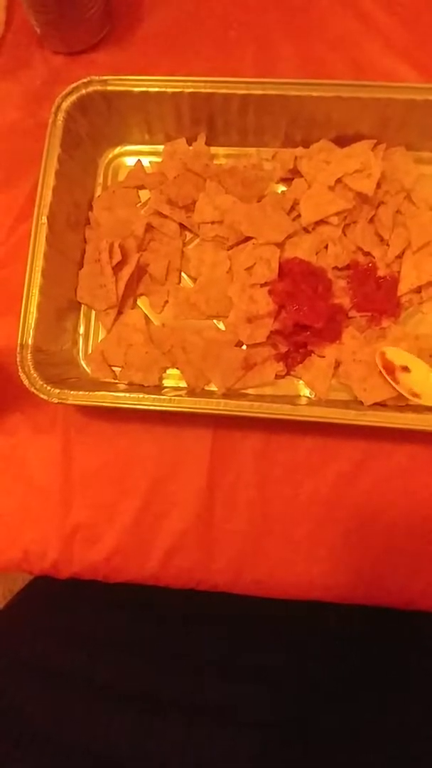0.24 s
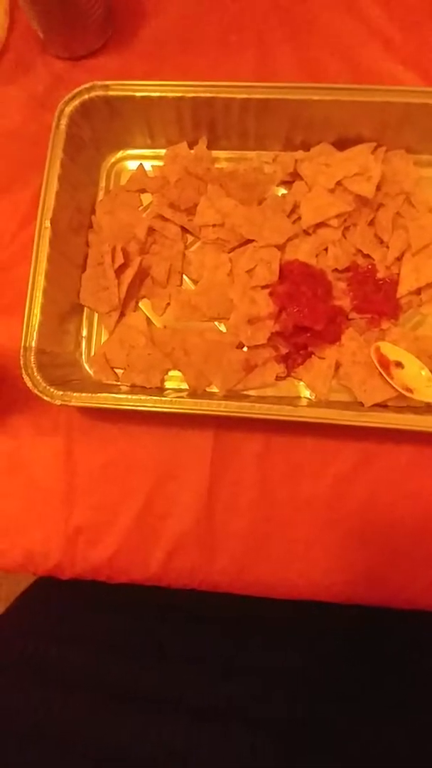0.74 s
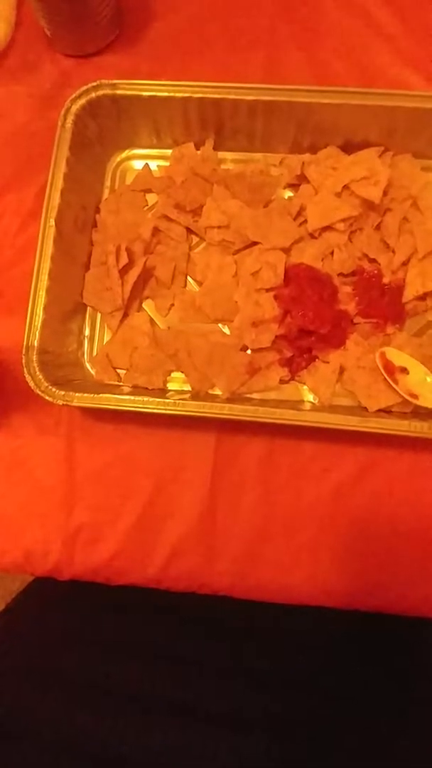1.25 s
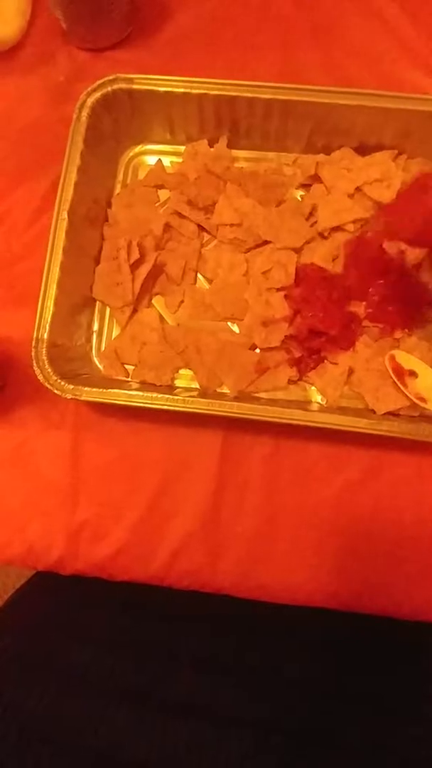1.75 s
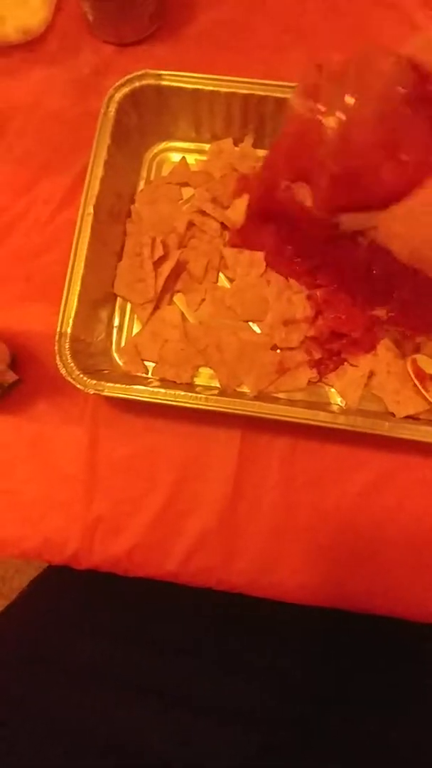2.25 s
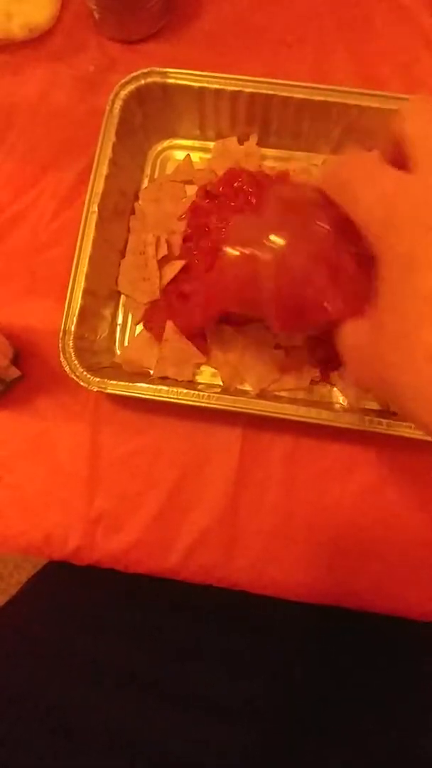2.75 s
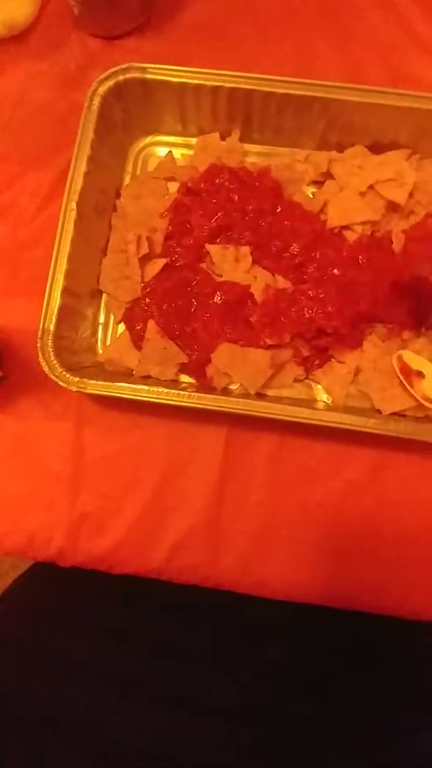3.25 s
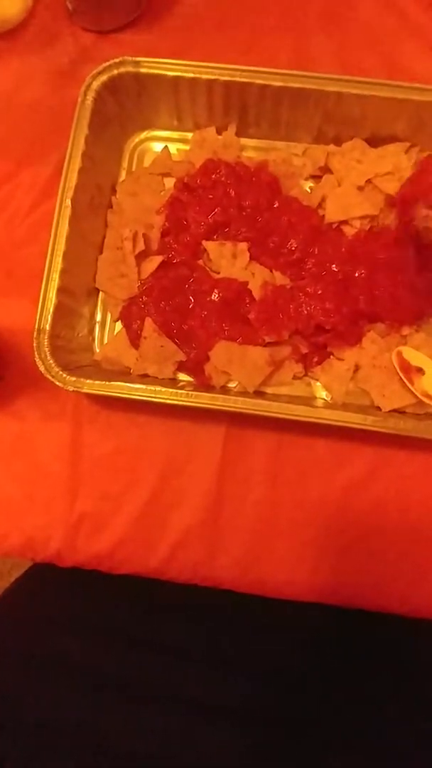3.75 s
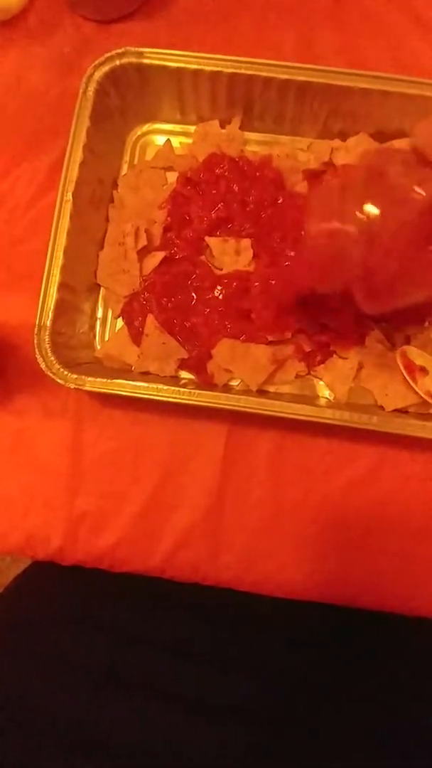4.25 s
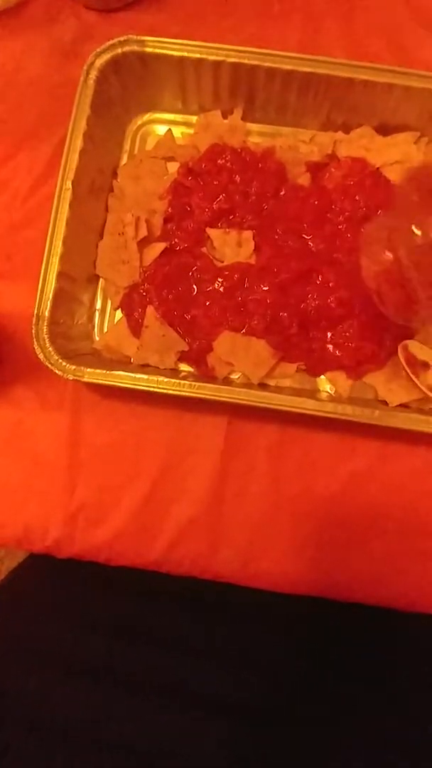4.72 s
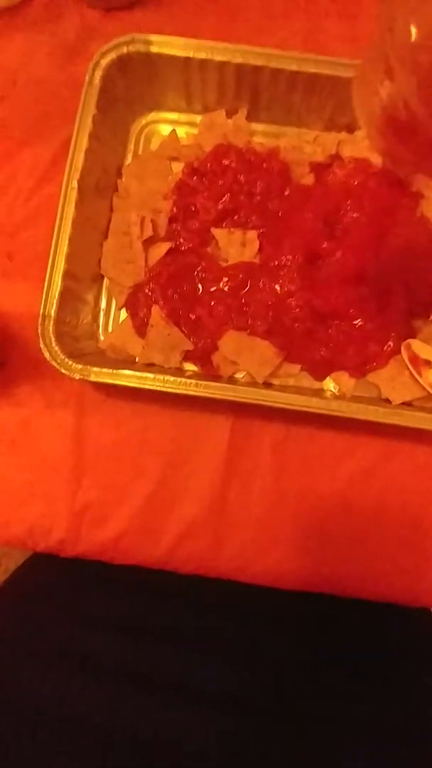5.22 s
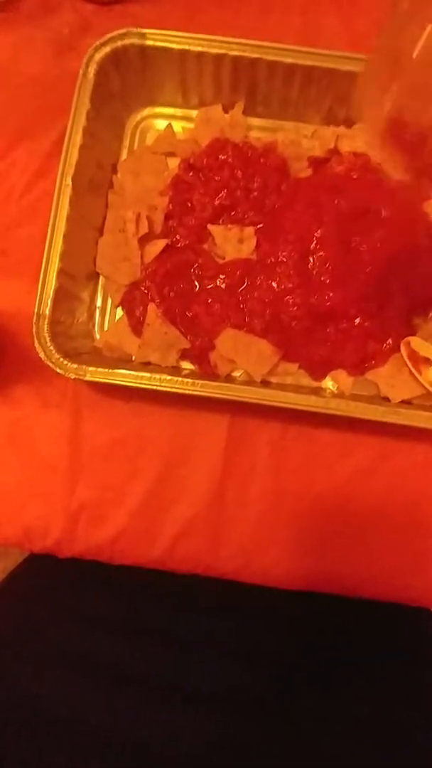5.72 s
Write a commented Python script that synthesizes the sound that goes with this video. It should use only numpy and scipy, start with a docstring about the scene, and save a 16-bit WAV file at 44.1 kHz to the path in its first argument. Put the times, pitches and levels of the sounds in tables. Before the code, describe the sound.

A close stereo pickup in a small home kitchen, with faint low appliance rumble and wavering hum throughout. After barely audible rustles, something hard knocks the covered table at about 0.2 s and bounces twice within a tenth of a second, sharp and short-ringing, with a dull scrape trailing to 0.4 s. It is nearly quiet until 1.4 s, when bright little ticks and light scrapes begin as a spoon pushes sauce over crisp chips in a thin foil pan. Crackling thickens from 2.0 s, with two soft, low wet plops near 2.2 and 2.3 s. The loudest passage runs 2.7 to 3.0 s: a crunchy, crackly scrape with stiff clacks and bright snaps. It falls away abruptly. Sparse faint scratches follow, with small clusters around 3.9 to 4.25 s and 4.5 to 4.75 s, then thin bright ticks near 5.1 and 5.4 s, and almost nothing to the end at 6 s.

```python
"""Chunky sauce over crisp chips

Chips slide, scrape and snap in a thin foil pan: friction noise and brief slips pass through the foil's colour.
Early on something hard knocks and bounces on the covered table as a set of damped modes over a noise crack.
Two lumps of sauce thud into the pan, each a short slap over three low modes of the pan floor.
Sparse kitchen reflections, low appliance rumble and wavering hum lie behind. Two close microphone ports listen.
"""
import sys
import numpy as np
from scipy import signal
from scipy.io import wavfile
from scipy.ndimage import uniform_filter1d

SR = 44100
rng = np.random.default_rng(int(sys.argv[2]) if len(sys.argv) > 2 else 0)


def store_pcm(level_fs):
    """Save levels as 16-bit WAV."""
    pcm = np.round(np.clip(level_fs, -1, 1) * 32767).astype(np.int16)
    wavfile.write(sys.argv[1], SR, np.atleast_2d(pcm).T)


def linear_from_db(decibels):
    """Turn decibels (scalar or array-like) into linear amplitude factors; 0 gives 1."""
    return 10 ** (np.asarray(decibels, float) / 20)


N = 263718  # length in samples

# Chips sliding on foil. Each row: start in seconds, stroke length in seconds, level in dB before the
# stroke's envelope, spectral tilt in dB per octave.
CHIP_SLIDES = [(0.023, 0.078, -57.5, -4.5), (0.108, 0.038, -52, -4), (0.3, 0.03, -30, -7.5),
               (0.333, 0.05, -40, -8.5), (0.385, 0.04, -43.5, -8), (0.499, 0.09, -73.5, 5),
               (0.686, 0.09, -69.5, 4.5), (0.834, 0.09, -73, 3), (0.991, 0.12, -74, 5),
               (1.396, 0.04, -63.5, 0), (1.451, 0.032, -61, 7), (1.483, 0.05, -43, 0),
               (1.536, 0.041, -58, 0), (1.57, 0.045, -42.5, -1), (1.641, 0.045, -32.5, 1.5),
               (1.784, 0.045, -39.5, 2.5), (1.89, 0.078, -58.5, 3.5), (1.967, 0.03, -44.5, 5.5),
               (1.996, 0.041, -33.5, 3), (2.052, 0.068, -36, 3.5), (2.115, 0.09, -43, 1.5),
               (2.241, 0.025, -51, 0.5), (2.263, 0.04, -44.5, -2), (2.331, 0.03, -45, 0.5),
               (2.39, 0.03, -44, -1), (2.505, 0.045, -53.5, 0.5), (2.566, 0.062, -40, 1.5),
               (2.623, 0.035, -40, -1), (2.659, 0.027, -35, -0.5), (2.713, 0.043, -24, 0.3),
               (2.745, 0.045, -20.5, -2), (2.798, 0.085, -28, -1.8), (2.891, 0.05, -25, -0.5),
               (2.958, 0.06, -32, -3), (3.023, 0.064, -57, 0.5), (3.139, 0.048, -60.5, -4),
               (3.215, 0.034, -58.5, -5.5), (3.318, 0.03, -67, 0.2), (3.651, 0.05, -65.5, -3),
               (3.689, 0.04, -54.5, -5), (3.86, 0.07, -41.5, 0.2), (4.003, 0.065, -53, 6.5),
               (4.081, 0.045, -61.5, -4), (4.201, 0.03, -46.5, 2.5), (4.355, 0.027, -56, -3),
               (4.423, 0.04, -64, 3), (4.522, 0.05, -41, -6), (4.577, 0.05, -50, -6.5),
               (4.678, 0.016, -47, -7.5), (4.708, 0.038, -51.5, -5), (4.939, 0.054, -59, -1),
               (5.085, 0.076, -70, 11.5), (5.208, 0.031, -67, 11), (5.399, 0.03, -44.5, 4.5),
               (5.431, 0.045, -55.5, 4), (5.773, 0.044, -60.5, 5), (5.931, 0.054, -71.5, -1.5)]
# Clear single snaps. Each row: start in seconds, level in dB, spectral tilt in dB per octave.
CHIP_SNAPS = [(0.12, -51.5, -2), (0.3856, -35.5, -6), (1.4435, -33.5, 23.5), (1.462, -39.5, 19),
              (1.4852, -43, 22), (2.004, -38.5, 4.5), (2.0585, -33.5, 4), (2.0648, -25, 7.5),
              (2.092, -36, 13), (2.132, -33, 3), (2.159, -35, 9), (2.2674, -38, 1.5), (2.2893, -40, 7),
              (2.3279, -41, 3), (2.412, -28, 3.5), (2.587, -44.5, 14.5), (2.5962, -42, 2),
              (2.7511, -23, -1.5), (2.803, -28.5, -3), (2.818, -33.5, 0), (2.85, -35, -8),
              (2.863, -31.5, -7), (2.883, -22.5, -1.5), (2.91, -20, 14), (2.9378, -32, -5),
              (3.003, -35, 1.5), (3.101, -54, -5), (3.158, -47.5, 3), (4.2115, -37.5, 6), (4.251, -41, 11),
              (4.344, -54, 9.5), (4.4351, -58, 10.5), (4.5297, -39.5, -4.5), (4.5488, -49, -4),
              (4.5879, -46, -5.5), (4.6837, -46, -9.5), (4.7179, -51, -3.5), (4.9324, -51, 7.5),
              (5.0359, -54.5, 16), (5.0755, -41.5, 24), (5.2094, -60, 10.5), (5.3943, -35.5, 9),
              (5.4349, -35, 12), (5.934, -60.5, -1)]
# Short pitched clacks of stiff chip pieces. Each row: start in seconds, level in dB, centre pitch in Hz.
CHIP_CLACKS = [(0.118, -32.5, 3220), (.12, -37, 1860), (0.23, -15, 9230), (1.794, -31, 3080),
               (2.279, -26, 3270), (2.64, -21, 9600), (2.72, -14, 2100), (2.746, -17, 3970),
               (2.748, -11, 8200), (2.75, -17, 5860), (2.76, -26, 1180), (2.779, -23, 3660),
               (4.032, -45, 3900), (4.051, -41.5, 3570), (4.547, -37, 1750), (4.587, -34, 3360),
               (4.592, -42, 2000), (4.609, -38.5, 3290), (4.681, -43, 1250), (4.715, -41.5, 3230),
               (4.744, -49, 3300), (4.932, -36, 5050), (4.965, -47.5, 2640), (5.206, -38, 8460)]
# Left-right balance of clacks by pitch. Each row: frequency in Hz, left over right in dB.
CLACK_BALANCE = [(1200, 4), (1900, 8), (3250, -9.5), (4500, -2.5), (9000, 6.5)]
# Colour of foil crackle at the microphone. Each row: frequency in Hz, relative density in dB per Hz.
FOIL_SPECTRUM = [(150, -26.5), (330, -11), (530, -18.5), (780, -7), (1500, -4.5), (2000, -3.5), (3300, -1),
                 (5600, -5.5), (7050, -12.5), (8000, -6.5), (9500, -1.5), (10700, -22), (12000, -13),
                 (15300, -23), (16300, -40)]
# A knock and its bounces. Each row: start in seconds, ring level in dB, crack level in dB,
# tilt of the ring in dB per octave, left over right in dB.
TABLE_KNOCKS = [(0.21, -21.5, -24, 4.5, -0.5), (0.243, -19, -13, 4, -1), (0.2874, -21.5, -21, 3, -2.5)]
# Modes of the knocked object. Each row: nominal frequency in Hz, level in dB before tilt, t60 in seconds.
KNOCK_MODES = [(807, -8, 0.16), (1022, -8, 0.14), (1295, -10, 0.24), (1462, -7.5, 0.12), (1870, 2, 0.035),
               (2092, -10, 0.16), (2316, -9, 0.072), (2700, -13.5, 0.24), (3080, -7.5, 0.12),
               (3570, -4.5, 0.02), (3570, -7.5, 0.065), (4970, -13.5, 0.035), (5530, -8, 0.038),
               (5800, -20, 0.046), (7820, -19, 0.028), (8330, -12, 0.017)]
# Lumps of sauce landing. Each row: start in seconds, slap level in dB, slap pitch in Hz,
# boom level in dB before its division among modes, middle boom pitch in Hz.
SAUCE_THUDS = [(2.195, -27.5, 663, -39.5, 232.4), (2.272, -28.5, 680, -38, 243.5)]
# Decay of the kitchen's reflections. Each row: frequency in Hz, t60 in seconds.
KITCHEN_DECAY = [(300, 0.38), (1000, 0.33), (3000, 0.17), (8000, 0.15), (15000, 0.059)]
# Spectrum of the room tone. Each row: frequency in Hz, relative density in dB per Hz.
ROOM_SPECTRUM = [(15, -2), (46, -4), (68, -9.5), (90, -21.5), (135, -11.5), (165, -15.5), (220, -14),
                 (350, -16), (500, -24.5), (855, -26), (1050, -35), (2600, -44.5), (9000, -48.5),
                 (15100, -54), (16300, -62)]
# Likeness of the room tone at the two ports. Each row: frequency in Hz, left-right correlation.
PORT_LIKENESS = [(60, 0.82), (180, 0.97), (550, 0.53), (1650, -0.35), (4970, -0.58), (15000, -0.35)]
# Wavering appliance tones. Each row: frequency in Hz, rms level in dB, bandwidth of the wander in Hz.
HUM_TONES = [(33.7, -60.5, 6.1), (59.2, -61, 4.4), (119.9, -57.5, 0.77), (259, -71.5, 9.4),
             (412.2, -68.5, 3.4)]

ROOM_RMS_DB, KITCHEN_DB = -47.5, -9.5  # kitchen level is against the direct sound
BEND_PER_TILT = -0.15  # bright sounds are also narrower
SLIDE_BEND_DB, SNAP_BEND_DB = -0.88, -0.5  # dB per octave squared: negative bows both ends down
SLIDE_SPREAD_DB, SNAP_SPREAD_DB = 1, 6.5  # scatter of left-right balance
SNAP_T60, TILT_PER_HALVING = 0.027, 29.5  # s at no tilt; dB per octave of tilt that halves it
CLACK_T60, CLACK_DAMPING = 0.03, 0.45  # s at 2 kHz; exponent by which higher pieces die sooner
CRACKLE_PER_S, CRACKLE_DB, CRACKLE_TILT_DB = 24, -3, 5  # chance snaps under a slide
GRIT_DB, GRIT_LOW_HZ, GRIT_OCTAVES = 3.0, 1101.6, 3.0  # chance clacks under a slide: level, pitch range


def slide(length, db, tilt_db, bend_db):
    """Stick-slip friction: hiss plus ringing slips under an arched stroke that judders at random."""
    length = max(length, .005)
    progress = np.arange(round(1.5 * length * SR)) / (length * SR)
    size = len(progress)
    stroke = np.minimum(progress / 0.27, 1) * linear_from_db(-35 * np.maximum(progress - .7, 0))
    # noise smoothed over 4 ms; the first 800 samples let the filter settle
    smoothed = signal.lfilter([1], [1, -np.exp(-1 / (.004 * SR))], rng.standard_normal(size + 800))
    judder_db = 3 * evened(smoothed[800:])
    hiss = 0.92 * both_ports(rng.standard_normal((3, size)), 0.84)
    rub = hiss + slips(size, 3200, 1.2, 0.0012)
    return linear_from_db(db) * foil_colour(evened(rub * linear_from_db(judder_db)) * stroke, tilt_db, bend_db)


def slips(size, per_s, spread_db, ring_s):
    """Impulsive excitation: each slip briefly rings a small patch of foil or chip at its own pitch."""
    draws = rng.random((int(size * per_s / SR) + 1, 6))
    when, pitch, weight, phase, lag, life = draws.T[:, :, None]
    hz = 300 + 15700 * pitch ** 1.5
    t = np.arange(300) / SR
    age = t / (ring_s * 8 ** (life - 1))  # from dry ticks to short rings
    strength = linear_from_db(-spread_db * np.log(weight + .03)) * np.sqrt(hz / 4000)
    envelope = strength * age * np.exp(-age)
    out = np.zeros((2, size + 300))
    places = (when * size).astype(int) + np.arange(300)
    for port in range(2):
        grains = envelope * np.sin(2 * np.pi * (hz * t + phase + port * lag))
        np.add.at(out[port], places, grains)
    return evened(out[:, :size])


def foil_colour(x, tilt_db, bend_db):
    """Radiation as a causal minimum-phase filter: the foil spectrum, tilted and bent about 4 kHz."""
    hz = np.abs(np.fft.fftfreq(1024, 1 / SR))
    octave = np.clip(np.log2(hz / 4000 + 1e-9), -2.3, 1.9)
    gain_db = read(FOIL_SPECTRUM, hz) + tilt_db * octave + bend_db * np.minimum(octave ** 2, 3.2)
    log_gain = np.log(linear_from_db(np.maximum(gain_db, -100)))
    # the Hilbert transform of log gain gives the minimum phase
    taps = np.fft.ifft(np.exp(np.conj(signal.hilbert(log_gain)))).real[:512]
    return signal.fftconvolve(x, taps[None] / np.linalg.norm(taps), axes=1)


def both_ports(x, unlike):
    """Extended radiator: the left port hears the shared part first; the whole sheet adds unlike parts."""
    shared, left, right = x
    unlike = np.clip(unlike, 0, 1)
    common = np.array([shared, np.roll(shared, 7)])  # delay in samples
    return np.sqrt(1 - unlike ** 2) * common + unlike * np.array([left, right])


def crackle(length, db, tilt_db):
    """Random point process: chance snaps and clacks of mixed size and colour while a chip slides."""
    out = np.zeros((2, round((length + .3) * SR)))
    chances = rng.random((8, 7))
    for use, when, size, colour, side, later, pitch in chances:
        happens = use < CRACKLE_PER_S * length / len(chances)
        size_db = db + 4.0 * np.log(size + .05)
        tilt = tilt_db + CRACKLE_TILT_DB * (2 * colour - .5)
        crack = snap(size_db + CRACKLE_DB, tilt, SNAP_BEND_DB, snap_t60(tilt))
        add(out, (.25 + 0.76 * when) * length, crack * happens, 2 * SNAP_SPREAD_DB * (2 * side - 1))
        hz = GRIT_LOW_HZ * 2 ** (GRIT_OCTAVES * pitch)
        piece = clack(size_db + GRIT_DB + .4 * tilt_db * np.log2(hz / 4000), hz)
        add(out, (0.14 + .7 * later) * length, piece * happens, read(CLACK_BALANCE, hz))
    return out


def snap(db, tilt_db, bend_db, t60):
    """Sudden release: a chip edge lets go with a sharp front, then the foil shivers as decaying noise."""
    t = np.arange(round(.08 * SR)) / SR
    shiver = linear_from_db(-60 * t / max(t60, .003)) * rng.standard_normal((3, len(t)))
    shiver[:, :12] += 2.0 * rng.choice([-1, 1], (3, 12))  # the crack itself
    return linear_from_db(db) * foil_colour(both_ports(shiver, 0.83), tilt_db, bend_db)


def snap_t60(tilt_db):
    """Damping by brightness: thin bright edges stop shivering sooner than dull thick ones."""
    return SNAP_T60 * 2 ** (-tilt_db / TILT_PER_HALVING)


def clack(db, hz):
    """Modal cluster: a stiff chip piece rings in four close, quickly damped modes."""
    t60 = CLACK_T60 * (hz / 2000) ** -CLACK_DAMPING
    shifts = [-.1, -.03, .03, .09] + .025 * rng.standard_normal(4)
    shifts = shifts * np.sqrt(1500 / hz)
    levels_db = (-7, -2, -3, -5)
    return sum(ring(db + mode_db, hz * (1 + k), t60, rise=.0015) for k, mode_db in zip(shifts, levels_db))


def ring(db, hz, t60, rise=0.0016):
    """Damped oscillation: one exponentially dying mode, with its own phase at each port."""
    t = np.arange(round(min(1.2 * t60, .3) * SR)) / SR
    lag = np.array([[0], [rng.uniform(-1.4, 1) * np.clip(hz / 800, 0, np.pi)]])
    envelope = linear_from_db(db - 60 * t / t60) * (1 - np.exp(-t / rise))
    return envelope * np.sin(2 * np.pi * hz * t + lag)


def knock(ring_db, crack_db, tilt_db):
    """Impact excitation: all modes ring at once, detuned a little by each contact, over a broad crack."""
    out = np.zeros((2, round(.3 * SR)))
    for hz, db, t60 in KNOCK_MODES:
        mode_db = ring_db + db + tilt_db * np.log2(hz / 2000)
        detuned_hz = hz * (1 + .007 * rng.standard_normal())
        add(out, 0, ring(mode_db, detuned_hz, t60, rise=.0007), 0)
    add(out, 0, snap(crack_db, tilt_db - 7, -0.49, 0.076), 0)
    return out


def thud(slap_db, slap_hz, boom_db, boom_hz):
    """Soft impact: a short wet slap, with three slower-rising modes of the pan floor booming on."""
    out = sum(ring(boom_db - 3.5, boom_hz * k, 0.25, rise=.008) for k in (.72, 1, 1.38))
    add(out, 0, ring(slap_db, slap_hz, 0.016), 0)
    return out


def kitchen(x):
    """Reverberation: sparse reflections of random sign, unlike at each port, each band with its own decay."""
    taps = np.zeros((2, SR // 2))
    slots = np.arange(60, SR // 2 - 20, 20)
    at = slots + rng.integers(0, 20, (2, len(slots)))  # one reflection in every 20 samples
    np.put_along_axis(taps, at, rng.choice([-1., 1.], at.shape), 1)
    hz, t, z = signal.stft(taps, SR, nperseg=256)
    decay = linear_from_db(-60 * t / read(KITCHEN_DECAY, hz)[:, None])
    tail = signal.istft(z * decay, SR, nperseg=256)[1]
    return signal.fftconvolve(x, tail / np.linalg.norm(tail[0]), axes=1)[:, :N]


def room_tone():
    """Partly coherent noise field: low rumble over faint hiss, alike in the bass, gently patchy."""
    frames, hz = N // 1024 + 5, np.fft.rfftfreq(4096, 1 / SR)
    a, b, c, d, patches = rng.standard_normal((frames, 2049, 5)).T
    patches = uniform_filter1d(patches, size=8, axis=0)  # along frequency
    patches = evened(uniform_filter1d(patches, size=5, axis=1))  # along time
    same = np.clip(read(PORT_LIKENESS, hz), -1, 1)[:, None]
    left, other = a + 1j * b, c + 1j * d
    z = np.array([left, same * left + np.sqrt(1 - same ** 2) * other])
    z *= linear_from_db(read(ROOM_SPECTRUM, hz)[:, None] + .8 * patches)
    tone = signal.istft(z, nperseg=4096, noverlap=3072)[1][:, :N]
    return linear_from_db(ROOM_RMS_DB) * evened(tone)


def hum():
    """Narrow-band modulation: appliance tones whose size and phase wander about a steady part."""
    t, out = np.arange(N) / SR, np.zeros(N)
    for hz, db, width in HUM_TONES:
        r = np.exp(-np.pi * width / SR)
        noise = rng.standard_normal((N, 2)) @ [1, 1j]
        wander = signal.lfilter([1], [1, -r], noise) * np.sqrt((1 - r ** 2) / 2)
        tone = ((1.9 + wander) * np.exp(2j * np.pi * hz * t)).real  # 1.9 is the steady part
        out += linear_from_db(db) * evened(tone)
    return out


def evened(x):
    """Power normalisation: scales to rms 1."""
    return x / np.sqrt(np.mean(x ** 2) + 1e-20)


def read(points, hz):
    """Interpolation of a table on a log-frequency axis."""
    f, value = np.transpose(points)
    return np.interp(np.log(hz + 1), np.log(f + 1), value)


def add(mix, s, sound, pan_db):
    """Superposition: adds a two-channel sound at time s with a left-right level difference."""
    part = mix[:, round(s * SR):][:, :sound.shape[1]]
    part += (sound * linear_from_db([[pan_db / 2], [-pan_db / 2]]))[:, :part.shape[1]]


def scene():
    """Superposition of the pan and table sounds, their echo in the kitchen, the room tone and the hum."""
    near = np.zeros((2, N))
    for s, length, db, tilt_db in CHIP_SLIDES:
        scrape = slide(length, db, tilt_db, SLIDE_BEND_DB + BEND_PER_TILT * tilt_db)
        add(near, s, scrape, SLIDE_SPREAD_DB * rng.standard_normal())
        add(near, s, crackle(length, db, tilt_db), 0)
    for s, db, tilt_db in CHIP_SNAPS:
        crack = snap(db, tilt_db, SNAP_BEND_DB + BEND_PER_TILT * tilt_db, snap_t60(tilt_db))
        add(near, s, crack, SNAP_SPREAD_DB * rng.standard_normal())
    for s, db, hz in CHIP_CLACKS:
        add(near, s, clack(db, hz), read(CLACK_BALANCE, hz))
    for s, ring_db, crack_db, tilt_db, pan_db in TABLE_KNOCKS:
        add(near, s, knock(ring_db, crack_db, tilt_db), pan_db)
    for s, *row in SAUCE_THUDS:
        add(near, s, thud(*row), 0)
    return near + linear_from_db(KITCHEN_DB) * kitchen(near) + room_tone() + hum()


def low_pass(x):
    """Removes everything above the highest recorded frequency."""
    return signal.sosfilt(signal.butter(12, 16820, fs=SR, output="sos"), x)


def record(dry):
    """Output stage: turns the finished two-port mix into the sound that is written out."""
    return low_pass(dry)


dry = scene()
out = record(dry)
store_pcm(out)
```